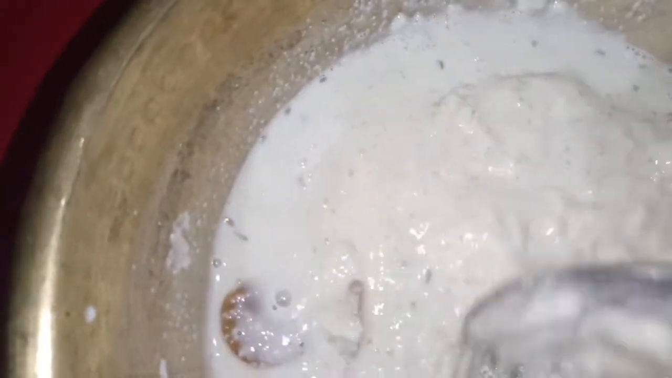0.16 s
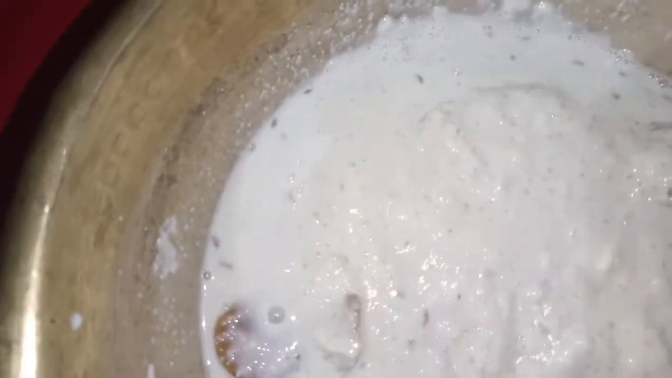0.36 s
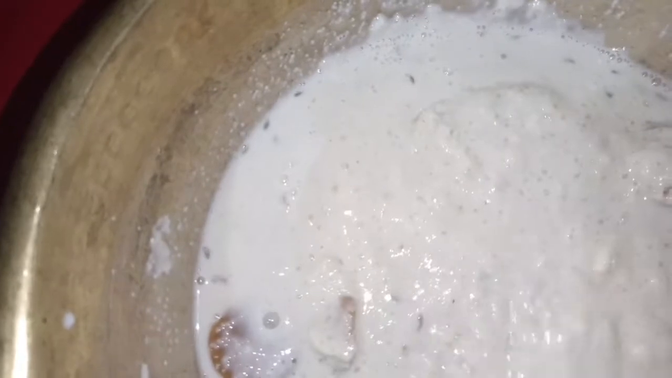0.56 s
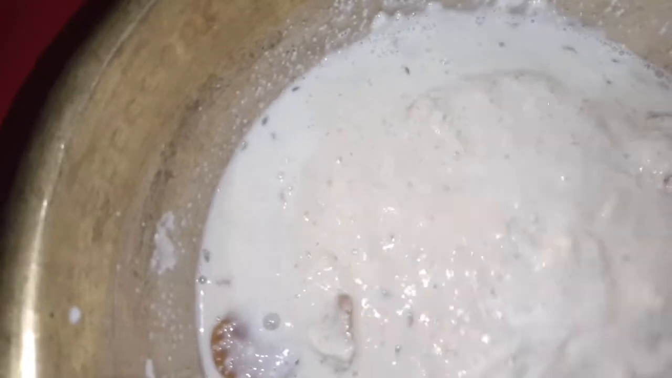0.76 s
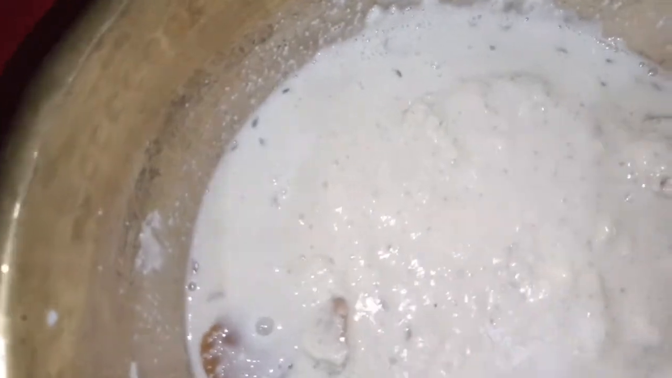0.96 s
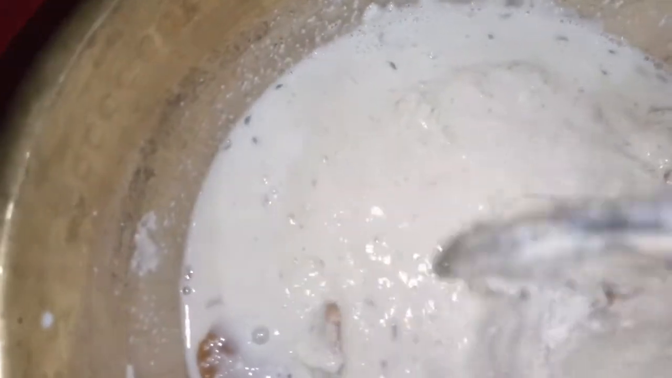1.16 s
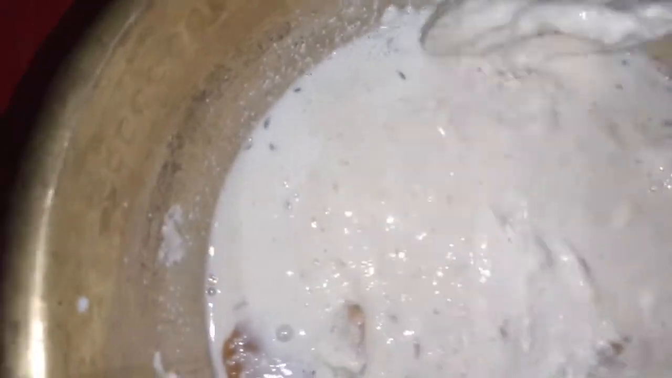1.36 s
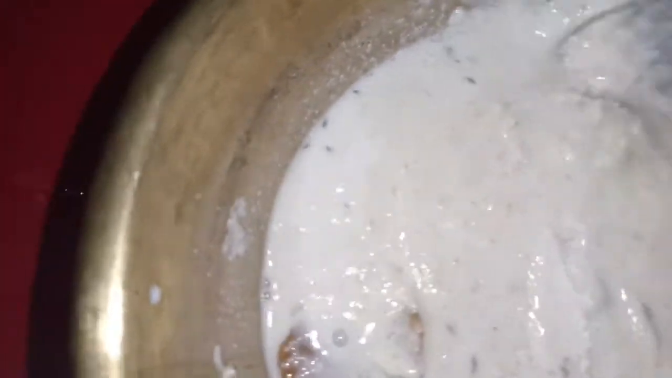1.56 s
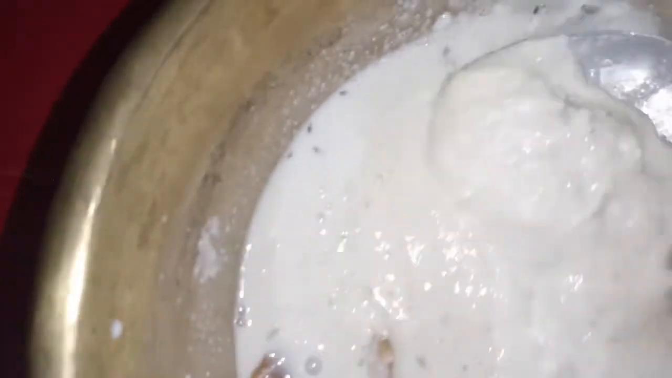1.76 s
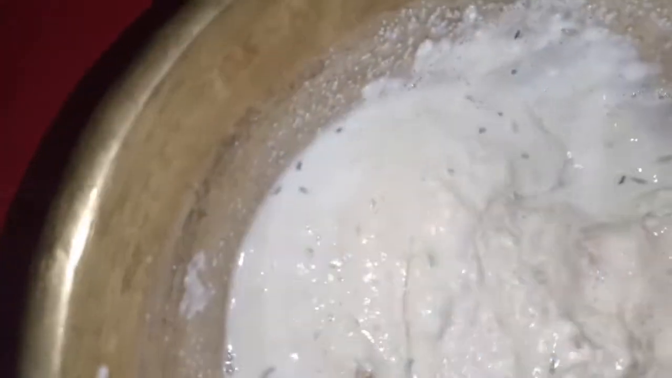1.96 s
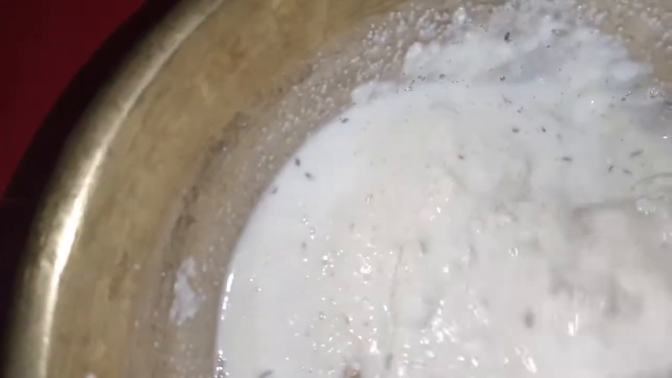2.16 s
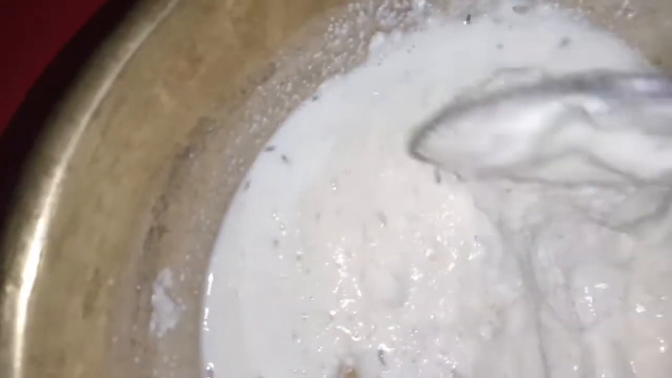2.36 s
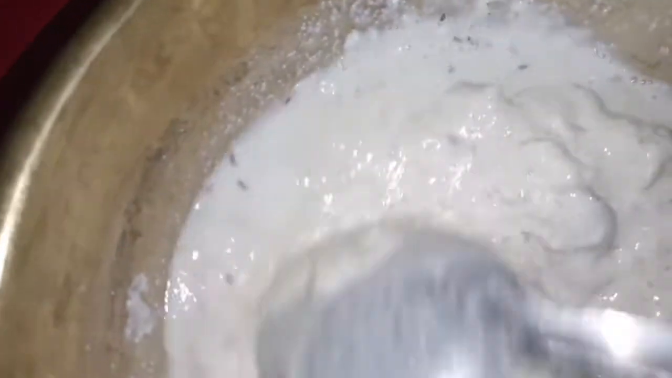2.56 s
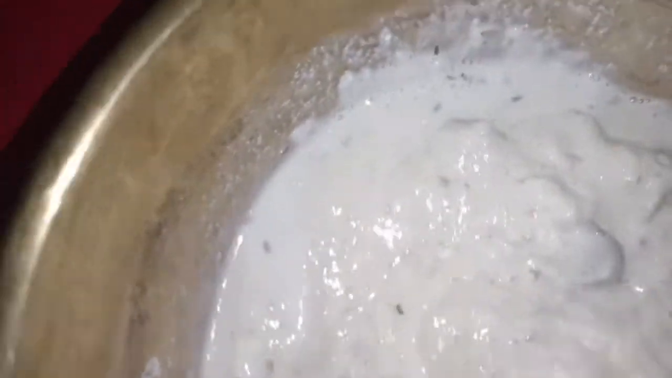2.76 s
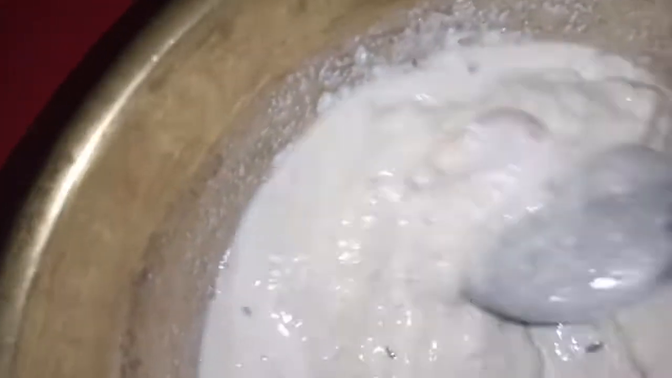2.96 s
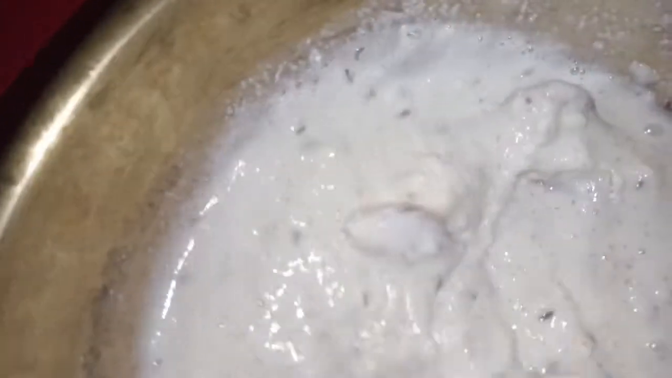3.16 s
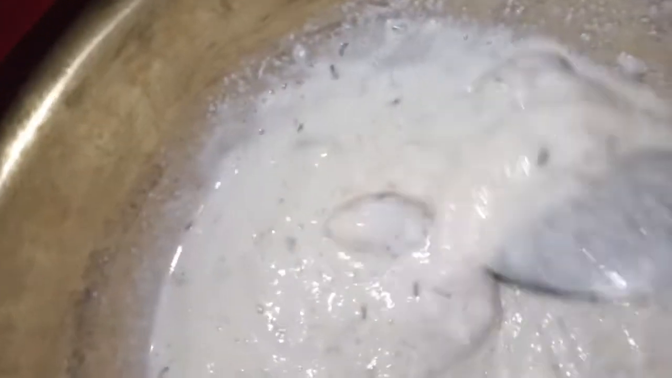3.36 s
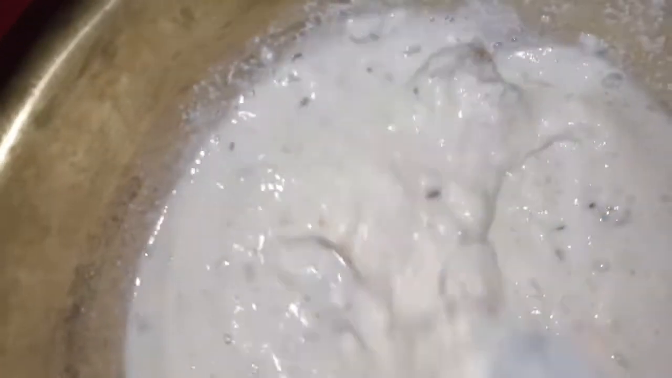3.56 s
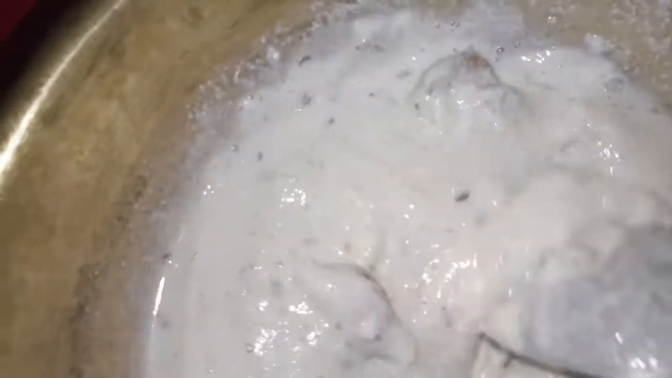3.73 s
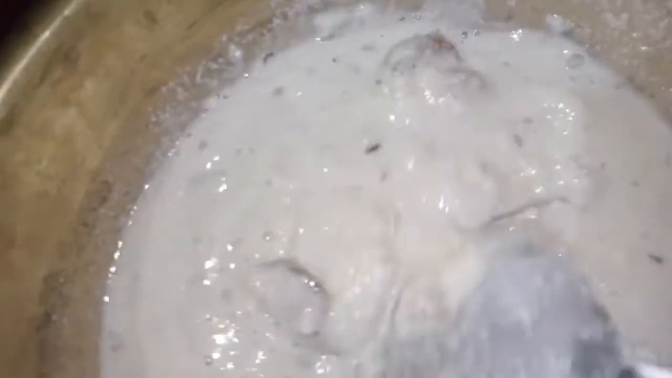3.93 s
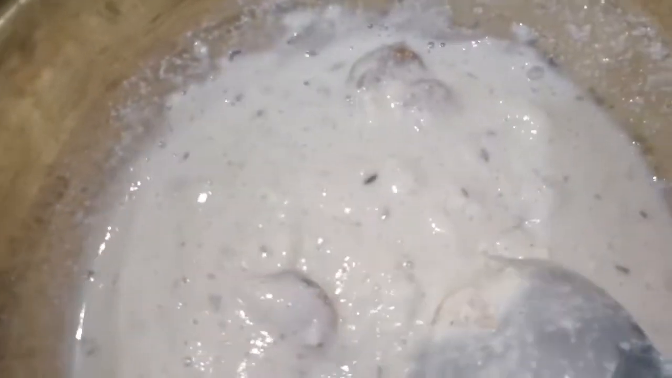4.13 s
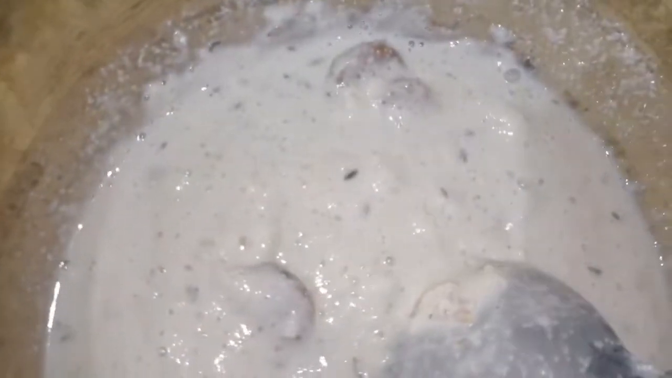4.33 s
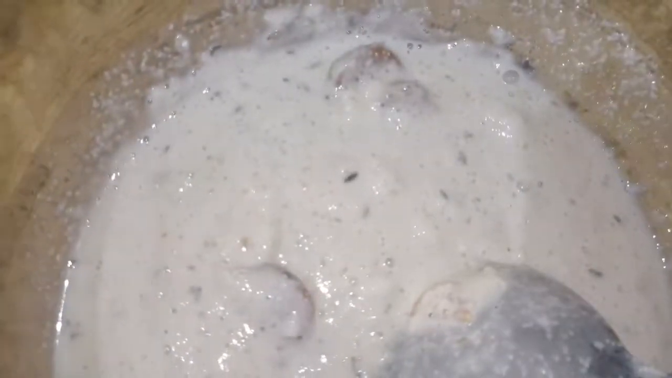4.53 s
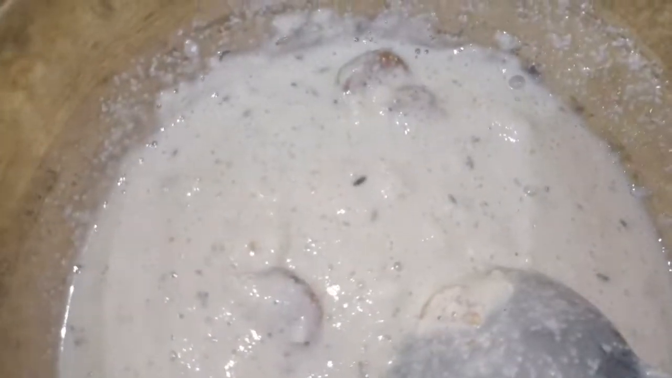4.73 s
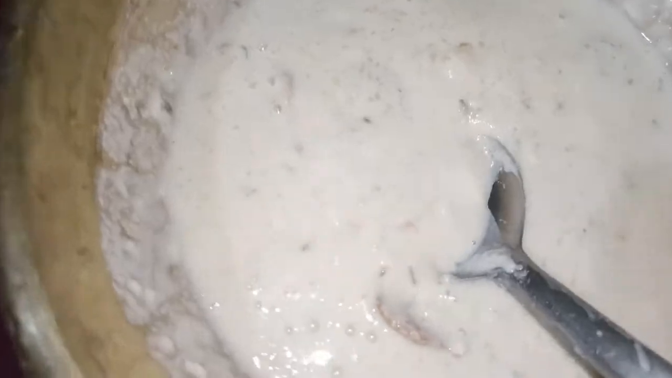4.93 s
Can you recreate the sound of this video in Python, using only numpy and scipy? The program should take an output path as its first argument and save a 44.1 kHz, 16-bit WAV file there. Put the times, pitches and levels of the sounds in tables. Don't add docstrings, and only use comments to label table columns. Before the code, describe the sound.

A metal ladle stirs thick batter in a brass bowl, with wet squelches, dull low thumps, metallic scrapes and clinks close up in a quiet kitchen.

```python
import sys
import numpy as np
from scipy import signal
from scipy.fft import rfft, irfft
from scipy.io import wavfile
from scipy.ndimage import uniform_filter1d

SR = 44100
rng = np.random.default_rng(int(sys.argv[2]) if len(sys.argv) > 2 else 0)


def to_wav(sig):
    pcm = np.clip(np.atleast_2d(sig), -1, 1) * 32767
    pcm = np.round(pcm).astype(np.int16)
    wavfile.write(sys.argv[1], SR, pcm.T)


def decibels_to_gain(level_db):
    exponent = np.asarray(level_db, float) / 20
    return 10 ** exponent


N = 224424
PORT_LAG = 10

# t/s, dull pop level/dB, pop f/Hz, low metal level/dB, high metal level/dB
KNOCKS = [(0.003, -37, 750, -43.5, -49), (0.43, -34.5, 660, -46, -31), (0.92, -27, 673, -50, -50),
          (1.512, -85, 802, -29, -40), (1.5963, -61, 888, -24.5, -22.5), (2.145, -20, 682, -35.5, -45),
          (2.245, -30, 1100, -28, -32), (2.267, -17.5, 590, -57, -64), (2.576, -15.5, 716, -36, -80),
          (2.899, -4, 687, -45, -40.5), (3.341, -11.5, 706, -26, -42.5), (3.39, -15, 800, -26.5, -37.5),
          (3.592, -42, 1030, -31.5, -49.5), (3.7168, -8, 640, -51, -55), (3.804, -25, 900, -21, -35.5),
          (4.799, -48, 987, -37, -38.5)]
# t/s, decay/(dB/s), table legs level/dB, table top level/dB, bowl base level/dB
JOLTS = [(.003, 81, -35, -32.5, -33), (0.43, 113, -30, -33, -36.5), (0.551, 156, -76, -83.5, -33),
         (0.918, 106, -33, -29.5, -60), (1.596, 79, -32, -33.5, -31.5), (2.145, 67, -56.5, -62, -56),
         (2.243, 76, -50.5, -77, -82.5), (2.351, 194, -76, -43, -59.5), (2.699, 63, -58, -56.5, -84),
         (2.861, 95, -57, -48, -58.5), (2.898, 301, -34, -42, -44), (3.084, 159.5, -44.5, -39.5, -43),
         (3.29, 101.5, -50, -50, -79), (3.339, 212.5, -36, -38, -46), (3.828, 155.5, -43.5, -45, -44),
         (3.389, 107.5, -34, -45, -31.5), (3.716, 103.5, -28, -35.5, -34.5), (3.905, 160, -47, -44, -77),
         (4.001, 84, -55, -76, -99), (4.798, 400, -81, -71, -66)]
# f/Hz, level/dB, t60/s
BASE = [(225, -17.5, 0.034), (291, -12, 0.35), (310.6, 0, 0.17), (410, -16.5, 0.36)]
# f/Hz, level/dB, t60/s
BOWL = [(762.6, -1, 0.37), (985, -1, 0.064), (1205, -6, 0.095), (1307.4, -9, 0.41), (1470, -14.5, 0.069),
        (1448, -13, 0.064), (1770, -14, 0.15), (1796, -12, 0.39), (1922, -9, 0.45), (2120, -8.5, 0.34),
        (2322, -6, 0.22), (3010, -8.5, 0.12), (3600, -7, 0.11), (3890, -3, 0.17), (4950, -15.5, 0.05),
        (4746, -29, 0.068), (6200, -28.5, 0.067)]


def unit(x):
    return x / np.linalg.norm(x)


def read(points, hz):
    f, value = np.transpose(points)
    return np.interp(np.log(hz + 1), np.log(f + 1), value)


def add(mix, s, sound):
    part = mix[..., round(s * SR):][..., :sound.shape[-1]]
    part += sound[..., :part.shape[-1]]


def balance(pan_db):
    return pan_db * np.array([[.5], [-.5]])


def ring(modes, spread_db=0., damp=0.8):
    hz, db, t60 = np.transpose(modes)[..., None]
    t = np.arange(SR // 2) / SR
    chance = rng.standard_normal((len(modes), 1))
    level = decibels_to_gain(db + spread_db * chance - 60 * t / (t60 * damp))
    return (level * np.sin(2 * np.pi * hz * t) * np.sign(chance)).sum(0)


def pair(size, colour_db, lag=0):
    # f/Hz, likeness/1
    likeness = [(60, 0.75), (300, 0.5), (640, 1), (1200, 0.78), (6000, 0.015), (15000, 0.065)]
    hz = np.fft.rfftfreq(size, 1 / SR)
    a, b = rfft(rng.standard_normal((2, size)))
    same = np.clip(read(likeness, hz), 0, 1)
    right = (same * a + np.sqrt(1 - same ** 2) * b) * np.exp(-2j * np.pi * hz * lag / SR)
    x = irfft(np.array([a, right]) * decibels_to_gain(colour_db(hz)), size)
    return x / x.std()


def hump(hz, centre_hz, below_db, above_db):
    octaves = np.log2((hz + 1) / centre_hz)
    return -np.minimum(np.where(octaves < 0, below_db, above_db) * octaves ** 2, 80)


def hoarse(width_hz, rows):
    s, hz, db = np.transpose(rows)
    t = np.arange(s[0], s[-1], 1 / SR)
    a, b = rng.standard_normal((2, 2, len(t) + SR // 4))
    lowpass = signal.butter(2, width_hz / 2, fs=SR, output="sos")
    smear = signal.sosfilt(lowpass, a + 1j * b)[:, SR // 4:]
    smear = smear / smear.std() + 45 / (width_hz + 25)
    line = (smear * np.exp(2j * np.pi * np.cumsum(np.interp(t, s, hz)) / SR)).real
    return s[0], decibels_to_gain(np.interp(t, s, db)) * line * signal.windows.tukey(len(t), .2)


def room_hum():
    # f/Hz, density/(dB per Hz)
    colour = [(24, -46.5), (40, -6), (93, -6), (229, -14.5), (548, -24), (606, -31), (973, -40),
              (1050, -36), (1380, -36), (1490, -34), (15500, -64)]
    return decibels_to_gain(-70.5) * pair(N, lambda hz: read(colour, hz))


def outside():
    # smear width/Hz, then rows of t/s, f/Hz, level/dB
    calls = [
        (60, [(2.005, 3250, -55), (2.04, 3264, -45), (2.115, 3245, -55), (2.15, 2960, -63), (2.22, 2760, -58), (2.27, 2680, -68)]),
        (100, [(2.27, 3324, -56), (2.3, 3530, -52), (2.35, 3455, -47), (2.56, 3530, -56), (2.66, 3648, -60), (2.8, 3600, -69), (2.85, 3380, -56), (2.9, 2700, -56.5)]),
        (89, [(2.57, 3700, -63), (2.62, 3910, -54), (2.7, 4200, -63), (2.78, 4250, -65.5), (2.87, 4050, -64)]),
    ]
    out = np.zeros((2, N))
    for width_hz, rows in calls:
        add(out, *hoarse(width_hz, rows))
    return out


def kitchen(hits):
    # f/Hz, t60/s
    decay = [(100, 0.13), (1000, 0.36), (4000, 0.13), (15000, 0.056)]
    x = hits - 0.29 * uniform_filter1d(hits, size=60)
    taps = rng.choice([-1., 1.], (2, SR // 2)) * (rng.random((2, SR // 2)) < .05)
    taps = taps * (np.arange(SR // 2) > 200)
    hz, t, z = signal.stft(taps, SR, nperseg=256)
    tail = signal.istft(z * decibels_to_gain(-60 * t / read(decay, hz)[:, None]), SR, nperseg=256)[1]
    return decibels_to_gain(-15.5) * signal.fftconvolve(x, tail / np.linalg.norm(tail[0]), axes=1)[:, :N]


def fizz():
    # t/s, peak level/dB, centre f/Hz
    bursts = [(0.4791, -40.5, 14300), (0.4826, -38, 14700), (1.5878, -51, 10570), (1.729, -48, 13500),
              (1.776, -58, 14000), (1.887, -65, 13500), (1.896, -65, 13500), (1.926, -57, 12000),
              (2.0123, -50, 10200), (2.1933, -43, 14200), (2.2867, -43.5, 10200), (2.5232, -60, 13900),
              (2.7771, -54, 13660), (2.9277, -50.5, 9100), (2.9382, -44.5, 10000), (2.9911, -33.5, 14700),
              (3.157, -50, 9990), (3.1848, -37.5, 14430), (3.2862, -48, 14860), (3.4177, -37.5, 13500),
              (3.8363, -43.5, 13200), (4.7985, -45, 9800)]
    out, t = np.zeros((2, N)), np.arange(1500) / SR
    t60_s, pan_db = 0.013, 13
    for s, db, centre_hz in bursts:
        puff = pair(len(t), lambda hz: hump(hz, centre_hz, below_db=40.0, above_db=32.0), PORT_LAG)
        add(out, s, decibels_to_gain(db - 5 + balance(pan_db) - 60 * t / t60_s) * puff)
    return out


def snaps():
    # t/s, peak level/dB, centre f/Hz, body level/dB, left minus right/dB
    films = [(0.338, -40, 9150, -62, 1.5), (0.3318, -38.5, 6110, -51, -8), (0.994, -52, 6740, -70, 1),
             (1.066, -58, 12800, -68, 10), (1.068, -47.5, 6100, -60, -6), (3.8115, -40, 5500, -22, -2),
             (3.387, -56, 6075, -27, -3.5), (3.797, -56, 5970, -27.5, 0), (1.046, -58, 13500, -87, 14),
             (1.397, -54, 11530, -49, 10.5), (1.726, -43, 4900, -29.5, 1), (2.862, -48.5, 6500, -70.5, 0.5),
             (2.036, -44.5, 5900, -60, -5.5), (2.171, -43, 6300, -38, 5), (2.2767, -41.5, 5860, -48, -5),
             (2.929, -51, 6070, -26.5, -5), (2.982, -48, 9000, -24, 0), (3.1515, -62, 10030, -48.5, -3.5),
             (3.1944, -37, 13740, -29, 9.5), (3.304, -35, 4840, -38.5, -3), (3.5947, -43, 9170, -39, 5),
             (3.7486, -41, 5100, -40.5, -13.5), (4.0567, -62, 3930, -52, -7.5),
             (4.793, -66.5, 10600, -46.5, 19), (4.969, -42, 7120, -75.5, 12),
             (4.9774, -63.5, 6470, -65, -5), (4.998, -43, 6130, -49.5, -1)]
    # t/s, peak level/dB, body level/dB
    ticks = [
        (0.104, -54, -74),
        (2.749, -54, -74),
        (2.691, -62, -70),
        (3.279, -56, -38.5),
        (4.745, -71, -61),
        (4.885, -57, -77),
    ]
    tick_hz, tick_pan_db = 5985, 1
    out, t = np.zeros((2, N)), np.arange(6000) / SR
    tail = decibels_to_gain(-8.0 - 60 * t / 0.0022) + decibels_to_gain(-9 - 60 * t / 0.035) + decibels_to_gain(-15.0 - 60 * t / 0.16)
    for s, db, centre_hz, body_db, pan_db in films + [(s, db, tick_hz, body, tick_pan_db) for s, db, body in ticks]:
        spit = pair(len(t), lambda hz: hump(hz, 12000, below_db=10.5, above_db=32.5), PORT_LAG)
        spit = decibels_to_gain(db - 8.5 - 60 * t / 0.0079) * spit
        puff = pair(len(t), lambda hz: hump(hz, centre_hz, below_db=56.5, above_db=19.0), PORT_LAG)
        body = pair(len(t), lambda hz: hump(hz, 2400, below_db=32.5, above_db=31.5), PORT_LAG)
        film = (decibels_to_gain(db - 2.0) * puff + decibels_to_gain(body_db - 3.5) * body) * tail
        add(out, s, decibels_to_gain(balance(pan_db)) * (film + spit))
    return out


def squeaks():
    # start t/s, length/s, f/Hz, width/Hz, level/dB
    rubs = [(0.129, 0.49, 1427, 247, -60.5), (0.55, 0.4, 1953, 215, -47), (.97, .12, 1870, 80, -58),
            (0.551, 0.63, 871, 94, -58.5), (0.615, 0.73, 1378, 252, -57), (0.688, 0.23, 6120, 535, -63),
            (1.133, .4, 1893, 73, -64), (1.269, 0.22, 890, 31.2, -65.5), (1.6, 0.55, 1836, 21.5, -60.5),
            (1.607, 0.34, 2120, 21, -61.5), (1.806, .24, 4070, 170, -63), (2.38, 0.32, 894, 30.2, -66),
            (2.387, 0.16, 6000, 890, -63.5), (2.464, 0.16, 1740, 30, -66), (2.586, 0.5, 3867, 436, -57),
            (2.593, 0.27, 1378, 41.6, -60.5), (3.175, 0.12, 775, 144, -43.5),
            (3.563, 0.18, 1400, 199, -57.5), (4.342, 0.15, 6150, 395, -71.5), (4.502, 0.14, 67, 25.16, -59),
            (4.557, 0.22, 2080, 116.3, -69), (4.746, 0.14, 1896, 318, -59), (0, 0.13, 3540, 397, -52.5),
            (4.738, 0.22, 3920, 119.2, -80), (4.665, 0.078, 1240, 60, -71), (4.609, 0.049, 1107, 60.5, -74),
            (4.967, .12, 988, 60, -76), (2.664, 0.069, 6600, 500, -64.5), (.5, 0.047, 4710, 150, -38),
            (0.495, 0.044, 5790, 200, -38), (0.521, 0.058, 4205, 200, -35), (.485, 0.046, 7150, 300, -49),
            (0.915, 0.021, 4200, 300, -44.5), (0.918, 0.015, 5100, 300, -54), (.92, .06, 1390, 60, -47),
            (.975, .05, 3000, 150, -53.5), (1.002, 0.019, 3680, 300, -49.5)]
    rise, sag = 0.2, 0.02
    out = np.zeros((2, N))
    for start, length, hz, width_hz, db in rubs:
        rows = [(start, hz * (1 + sag), db - 11),
                (start + rise * length, hz, db),
                (start + length, hz * (1 - sag), db - 9.5)]
        add(out, *hoarse(width_hz, rows))
    return out


def stroke(peak_s, build_s, release_db):
    step = 32
    t = np.arange(0, N, step) / SR - peak_s
    level = decibels_to_gain(np.where(t < 0, 15.5 * t / build_s, -release_db * t))
    return np.repeat(level * (t >= -build_s), step)[:N]


def landed(s):
    return min(abs(s - row[0]) for row in KNOCKS) < .005


def shake():
    # f/Hz, level/dB, t60/s
    legs = [(67, -11.5, 0.29), (84.5, -1, 0.15), (100.7, -0.5, 0.26)]
    # f/Hz, level/dB, t60/s
    table_top = [(157.8, 7, 0.27), (174.3, 4.5, 0.42)]
    land_s, lean_s = 0.0062, 0.097
    push = rng.standard_normal((3, N))
    level = np.ones((3, N)) * [[0], [0], [decibels_to_gain(-78.5)]]
    for row in KNOCKS:
        add(push[:2], row[0] + 0.0032, 1.18 * signal.windows.hann(120))
    for s, dying_db, *dbs in JOLTS:
        peak_s, build_s = (s + land_s, land_s) if landed(s) else (s, lean_s)
        level += [decibels_to_gain(db) * stroke(peak_s, build_s, dying_db * k) for db, k in zip(dbs, (1, 1, 1.64))]
    x = np.zeros(N)
    for gain, shove, modes in zip(level, push, (legs, table_top, BASE)):
        x += signal.oaconvolve(gain * shove, unit(ring(modes, damp=0.69)))[:N]
    x *= decibels_to_gain(-1.0)
    return np.array([x, np.roll(x, PORT_LAG)])


def thumps():
    # t/s, f/Hz, peak level/dB, t60/s
    blows = [(0, 129.7, -17.5, .16), (0, 153.8, -20.5, 0.62), (.004, 308, -32, 0.14), (0, 404, -32.5, 0.41),
             (.002, 501, -40.5, 0.39), (.002, 1266, -38, .15), (2.9034, 303, -7.5, .095),
             (2.929, 760, -23, 0.032), (.922, 240, -33, 0.29), (.93, 307, -41.5, 0.42),
             (2.906, 96.5, -18, 0.35), (2.95, 309, -22, 0.17), (2.968, 415, -20.5, 0.037),
             (3.3444, 317, -13, .085), (3.349, 100, -17, 0.21), (3.4, 96, -20.5, 0.4),
             (3.41, 187, -29.5, 0.21), (3.72, 290, -20, .07), (3.722, 176.5, -29, 0.29)]
    out, t = np.zeros(N), np.arange(SR // 3) / SR
    rise = 1 - np.exp(-t / 0.0014)
    for s, hz, db, t60 in blows:
        add(out, s, decibels_to_gain(db - 60 * t / t60) * rise * np.sin(2 * np.pi * hz * t))
    return np.array([out * decibels_to_gain(-2.3), np.roll(out, PORT_LAG) * decibels_to_gain(-2.5)])


def patchy(x, patch_db, flicker_db):
    z = signal.stft(x, nperseg=128, noverlap=96)[2]
    patches, flicker = rng.standard_normal((2,) + z.shape[1:])
    patches = uniform_filter1d(uniform_filter1d(patches, size=2, axis=0), size=40, axis=1)
    flicker = uniform_filter1d(flicker, size=16, axis=0)
    crackle = np.maximum(flicker / flicker.std(), 0) ** 2
    gain = decibels_to_gain(patch_db * patches / patches.std() + flicker_db * np.minimum(crackle, 6))
    return signal.istft(z * gain / np.sqrt(np.mean(gain ** 2)), nperseg=128, noverlap=96)[1][:, :N]


def streaky(x, streak_db):
    z = signal.stft(x, nperseg=1024, noverlap=768)[2]
    streaks = rng.standard_normal(z.shape[1:])
    streaks = uniform_filter1d(uniform_filter1d(streaks, size=2, axis=0), size=9, axis=1)
    gain = decibels_to_gain(streak_db * streaks / streaks.std())
    return signal.istft(z * gain / np.sqrt(np.mean(gain ** 2)), nperseg=1024, noverlap=768)[1][:, :N]


def squelch(per_s):
    out, t = np.zeros((2, N)), np.arange(900) / SR
    for hz in np.geomspace(480, 1050, 12):
        blip = np.sin(2 * np.pi * hz * (t + 5.8 * t ** 2)) * np.exp(-t * hz / 1.9)
        blip *= 1 - np.exp(-t / 0.000053)
        sizes = decibels_to_gain(1.95 * np.minimum(rng.exponential(1, N), 4)) * (rng.random(N) < per_s / SR)
        out += signal.oaconvolve(sizes, blip)[:N] * decibels_to_gain(2.6 * rng.standard_normal((2, 1)))
    return out / out.std()


def pressure():
    # level/dB of squelch, wall, grit, hiss
    rest_db = [-92, -76, -85.5, -88.5]
    # peak t/s, build-up/s, release/(dB/s), pressure level/dB, grit above pressure/dB
    scrapes = [(0, .01, 87, -44.5, -11.5), (0.43, 0.0025, 453, -30, 0), (0.514, 0.072, 156, -40.5, 7.5),
               (.9, 0.77, 101.5, -57, -13), (0.922, 0.0087, 113, -53, 3), (1.58, 0.41, 297.5, -64.5, -2),
               (1.629, 0.04, 116.5, -32, -5), (2.155, 0.014, 98, -56, 1), (2.301, 0.17, 354, -43.5, -4.5),
               (2.584, 0.021, 497, -44.5, -24), (2.62, .04, 48.5, -69.5, -6),
               (2.93, 0.024, 153, -44.5, 0.5), (2.984, 0.072, 905, -45.5, -1),
               (3.029, 0.028, 105, -55, 3.5), (3.201, 0.054, 91.5, -46, -2.5),
               (3.343, 0.0024, 901.5, -56.5, 21.5), (3.443, 0.14, 170, -37.5, -5.5),
               (3.81, 0.022, 400.5, -43.5, 4.5), (3.902, 0.18, 397, -42, -4), (3.722, .006, 150, -48, -8),
               (3.285, .008, 120, -49.5, -8), (4.79, 0.059, 157, -77, 2)]
    # peak t/s, build-up/s, release/(dB/s), squelch level/dB, wet hiss level/dB
    slops = [(0, .01, 168.5, -35.5, -93.5), (.36, 0.048, 149, -100, -64), (0.433, 0.012, 269.5, -38.5, -57),
             (0.506, 0.039, 195, -35.5, -40), (.924, 0.0076, 117, -72, -67),
             (1.59, 0.71, 194.5, -71, -72.5), (1.633, 0.047, 120, -38.5, -80),
             (2.155, 0.014, 115, -44.5, -63), (2.304, 0.17, 232, -33.5, -60),
             (2.579, 0.0068, 900, -40.5, -97), (2.65, 0.044, 45, -80, -71),
             (2.901, 0.0065, 351.5, -27, -59), (2.954, 0.03, 177, -51, -48.5),
             (3.217, 0.071, 132.5, -74.5, -50.5), (3.326, 0.061, 300, -36, -58),
             (3.342, 0.0044, 1104, -28, -61.5), (3.44, 0.097, 152, -41.5, -53.5),
             (3.718, 0.0077, 202, -30.5, -68), (3.868, 0.14, 410, -31.5, -48.5),
             (4.79, 0.06, 100, -66, -78), (4.972, 0.0043, 216, -96, -53.5)]
    level = decibels_to_gain(np.array(rest_db))[:, None] * np.ones(N)
    for s, build_s, release_db, db, grit_db in scrapes:
        level[1] += decibels_to_gain(db) * stroke(s, build_s, release_db)
        level[2] += decibels_to_gain(db + grit_db) * stroke(s, build_s, release_db * 1.13)
    for s, build_s, release_db, squelch_db, hiss_db in slops:
        level[0] += decibels_to_gain(squelch_db) * stroke(s, build_s, release_db)
        level[3] += decibels_to_gain(hiss_db) * stroke(s, build_s, release_db * 0.94)
    return level


def drag():
    # f/Hz, density/(dB per Hz)
    wall_colour = [(350, -24.5), (600, -4), (950, -4.5), (1250, 9.5), (1600, 5.5), (2100, 2), (2600, -12),
                   (3100, -29)]
    # f/Hz, density/(dB per Hz)
    grit_colour = [(1900, -26.5), (2500, 0), (3300, 0.5), (4300, -7), (5400, -10.5), (7000, -14.5),
                   (8500, -40.5)]
    # f/Hz, density/(dB per Hz)
    hiss_colour = [(5500, -13), (6800, 0.5), (9000, -4.5), (12000, -7), (14800, -5.5), (15700, -0.5),
                   (16300, -43.5)]
    folds, *levels = pressure()
    layers = []
    for gain, colour in zip(levels, (wall_colour, grit_colour, hiss_colour)):
        noise = pair(N, lambda hz: read(colour, hz), PORT_LAG)
        layers.append(gain * streaky(noise, streak_db=4.5))
    wall, grit, hiss = layers
    metal = patchy(wall + grit, patch_db=3.0, flicker_db=1.0)
    bowl = np.array([unit(ring(BOWL, spread_db=2.5, damp=.3)) for port in range(2)])
    rung = signal.oaconvolve(metal, bowl, axes=1)[:, :N]
    wet = patchy(hiss, patch_db=6.5, flicker_db=2.0) * decibels_to_gain([[3.], [-4.5]])
    return decibels_to_gain(-9.0) * folds * squelch(per_s=63) + decibels_to_gain(-1.0) * metal + decibels_to_gain(-12.0) * rung + wet


def clinks():
    # t/s, f/Hz, peak level/dB, t60/s, left minus right/dB
    contacts = [(0.107, 7100, -57, 0.041, -11), (.193, 9300, -50.5, 0.0077, -8),
                (.193, 7050, -53, 0.0091, -13), (.215, 8100, -60, .015, -9), (.326, 6330, -39, .015, -8),
                (.43, 1296, -24, 0.023, -5), (.431, 3575, -20.5, 0.026, 10), (0.4323, 4280, -22, 0.017, 6),
                (0.434, 2450, -34, 0.057, -13), (.432, 3340, -35, 0.038, -4), (0.4312, 5400, -37, 0.013, 0),
                (0.954, 3080, -44.5, 0.11, 1), (.953, 4200, -50, .08, 3), (1.151, 10100, -57.5, 0.019, 5),
                (1.21, 6760, -49, 0.0078, -15), (1.2483, 6800, -28, 0.0037, -10.5),
                (1.249, 8740, -35, 0.0034, -7), (1.408, 3220, -45.5, 0.06, -1),
                (1.5125, 2400, -32, 0.033, 2), (1.5958, 1444, -13, 0.03, -7),
                (1.598, 1660, -15, .035, -4.5), (1.597, 4170, -16, 0.012, -2),
                (1.5972, 6240, -21.5, 0.0077, -15), (2.0055, 6750, -40, 0.0094, 7),
                (2.039, 3910, -40, 0.014, -4), (2.0373, 7600, -49, .012, 2),
                (2.2464, 1580, -26.5, .012, -11), (2.2463, 2680, -23, 0.0086, 4),
                (2.2457, 1130, -28.5, 0.02, -9), (2.4, 7760, -49.5, 0.0088, -11),
                (3.2795, 2670, -35, .015, -9), (3.305, 4120, -37, 0.017, -6), (3.528, 7650, -46, .01, -2),
                (3.8042, 3125, -14, 0.015, -2), (3.8045, 2150, -20, 0.013, 17),
                (3.8112, 3580, -21, 0.0096, -1), (4.778, 1940, -42, 0.022, 9),
                (4.97, 5700, -34.5, 0.013, 3), (4.97, 13600, -31, 0.0085, 15), (5.0, 5710, -44, 0.013, 2)]
    out = np.zeros((2, N))
    t = np.maximum(np.arange(6000) - np.array([[0], [PORT_LAG]]), 0) / SR
    rise = 1 - np.exp(-t / 0.0005)
    for s, hz, db, t60, pan_db in contacts:
        add(out, s, decibels_to_gain(db + balance(pan_db) - 60 * t / t60) * rise * np.sin(2 * np.pi * hz * t))
    return out


def knocks():
    out, t = np.zeros((2, N)), np.arange(SR // 2) / SR
    sag = 0.7 * t + 0.4 * 0.0079 * (1 - np.exp(-t / 0.0058))
    burst = decibels_to_gain(14.0 - 60 * t / 0.012) + decibels_to_gain(6.0 - 60 * t / 0.036)
    for s, pop_db, pop_hz, low_db, high_db in KNOCKS:
        pop = decibels_to_gain(pop_db + 4.5 - 60 * t / 0.012) * np.sin(2 * np.pi * pop_hz * sag)
        add(out, s, (pop * (1 - np.exp(-t / 0.0024)))[None])
        for db, modes, centre_hz in ((low_db, BOWL[1:10], 1600), (high_db, BOWL[10:], 4200)):
            crack = burst * pair(len(t), lambda hz: hump(hz, centre_hz, below_db=8.0, above_db=14.0))
            metal = np.array([ring(modes, spread_db=3, damp=.3) for port in range(2)])
            add(out, s, decibels_to_gain(db - 12.0) * (metal + crack) * (1 - np.exp(-t / 0.0022)))
    for s, *_, base_db in JOLTS:
        if landed(s):
            answer = decibels_to_gain(base_db + 3) * ring(BASE, spread_db=7.5)
            add(out, s, (answer * (1 - np.exp(-t / 0.0012)))[None])
    return out


def scene():
    background = room_hum() + outside()
    hits = fizz() + snaps() + clinks() + knocks()
    table = shake() * decibels_to_gain([[.5], [-.6]]) + thumps()
    return background + kitchen(hits) + table + squeaks() + drag() + hits


def band_limit(x):
    return signal.sosfilt(signal.butter(12, 16660, fs=SR, output="sos"), x)


def record(dry):
    x = signal.sosfilt(signal.butter(3, 58, "high", fs=SR, output="sos"), dry)
    x = signal.oaconvolve(x, signal.firwin(129, 16100, fs=SR)[None], "same")
    return band_limit(x)


dry = scene()
out = record(dry)
to_wav(out)
```